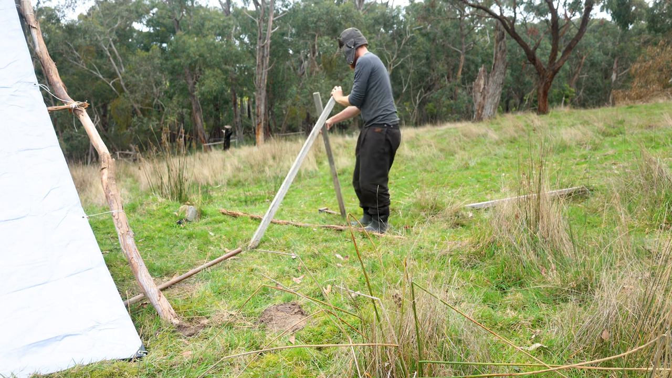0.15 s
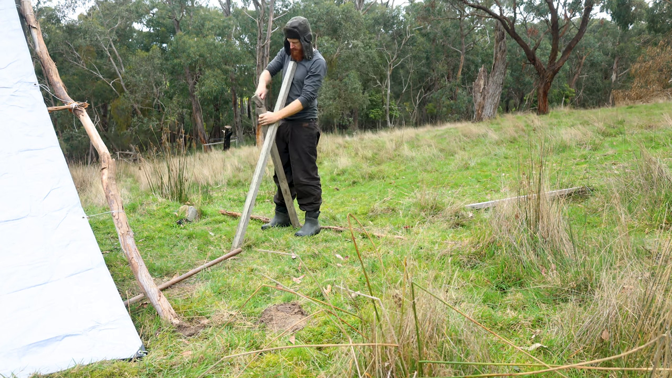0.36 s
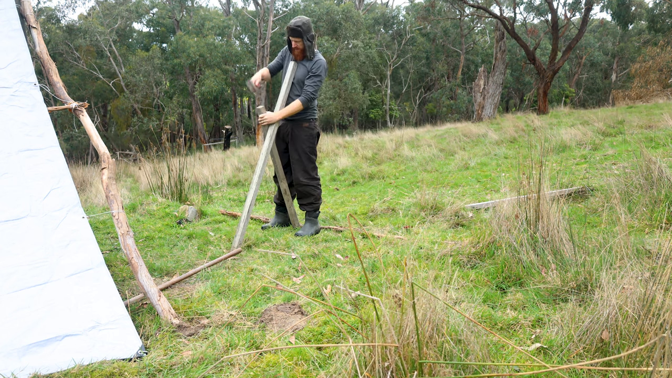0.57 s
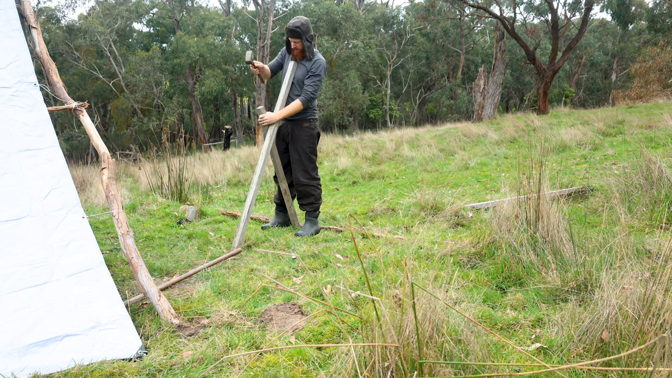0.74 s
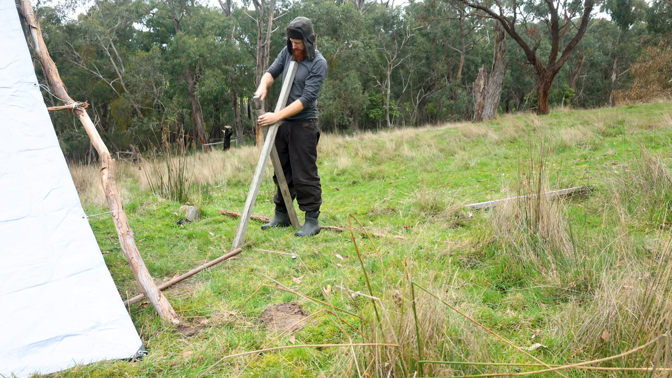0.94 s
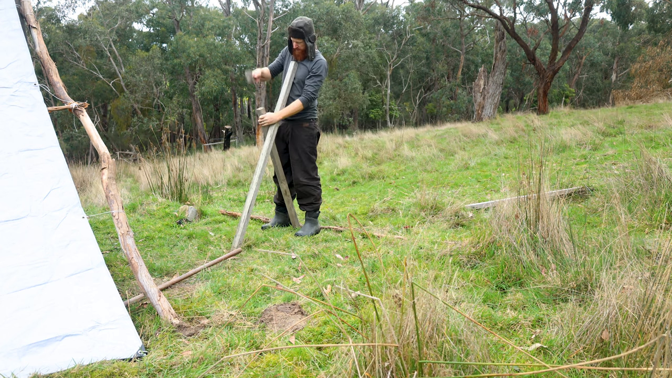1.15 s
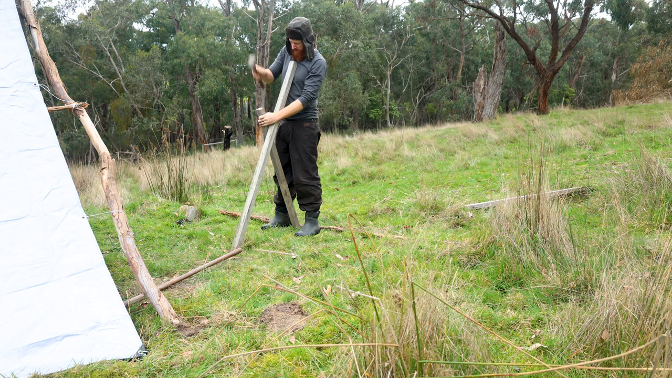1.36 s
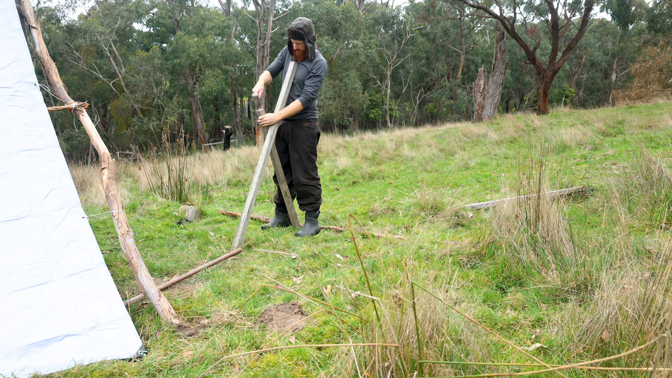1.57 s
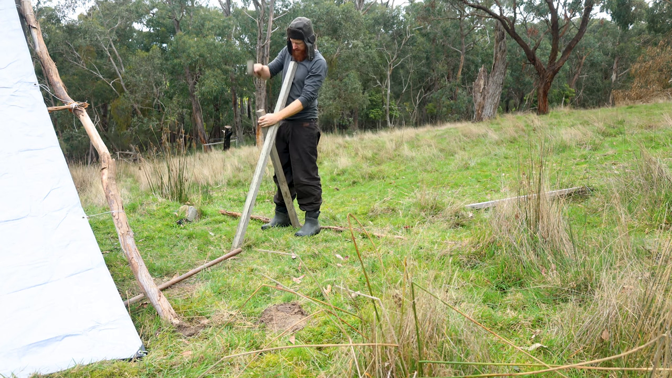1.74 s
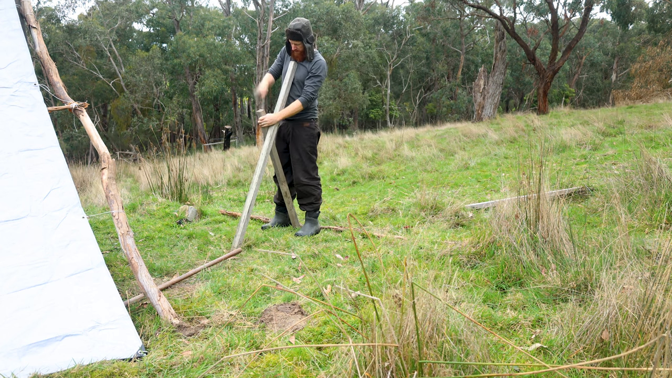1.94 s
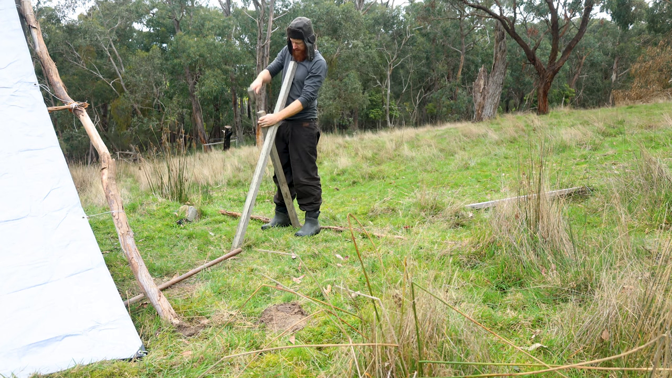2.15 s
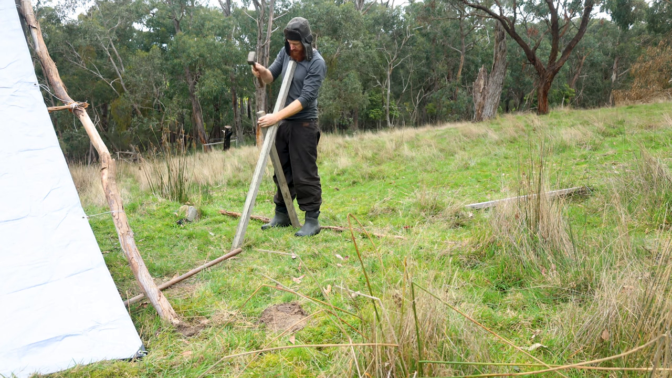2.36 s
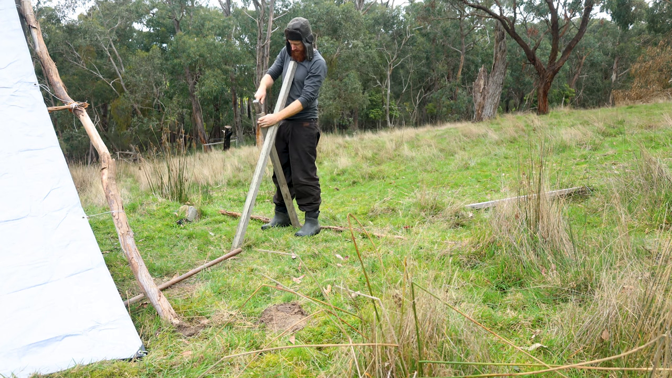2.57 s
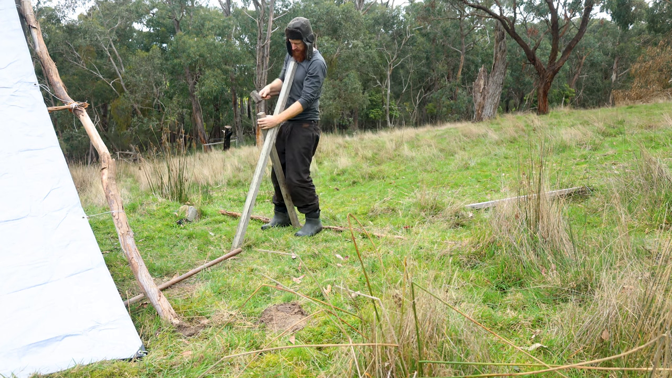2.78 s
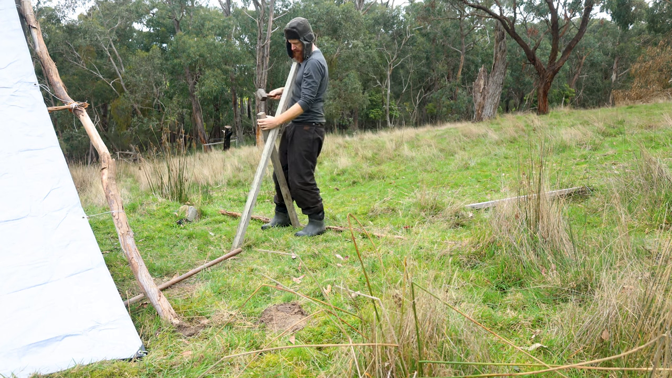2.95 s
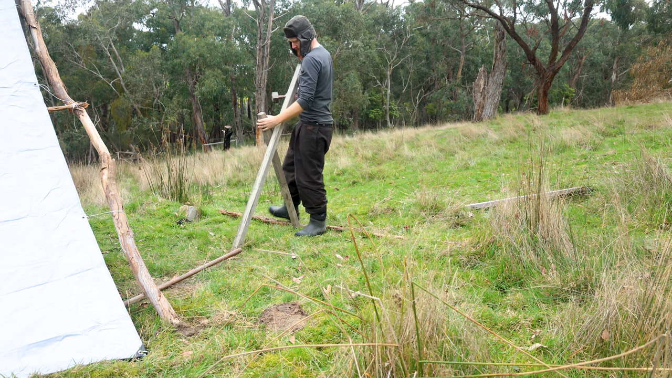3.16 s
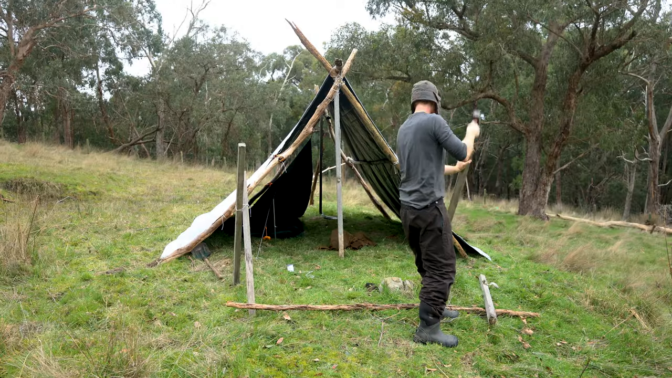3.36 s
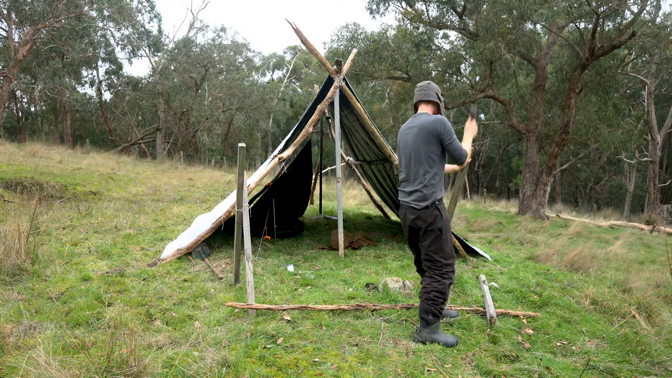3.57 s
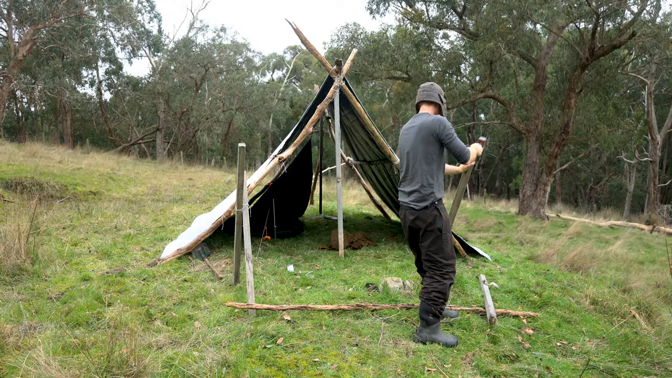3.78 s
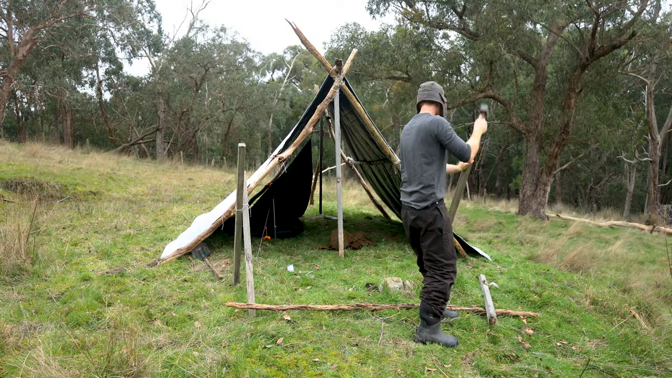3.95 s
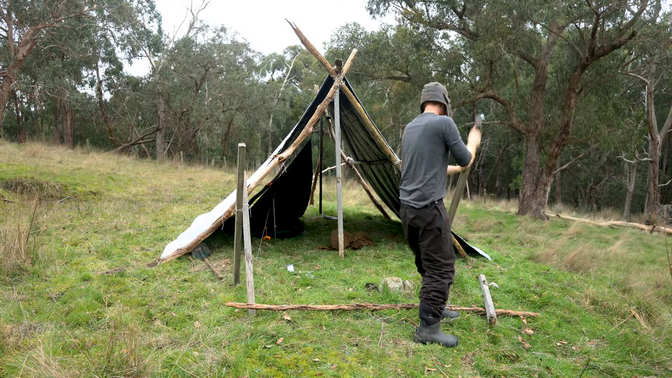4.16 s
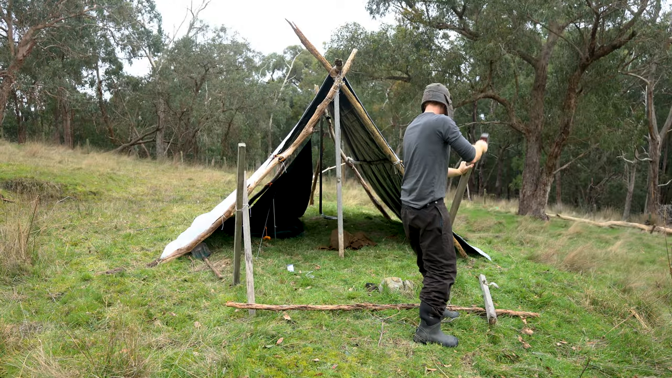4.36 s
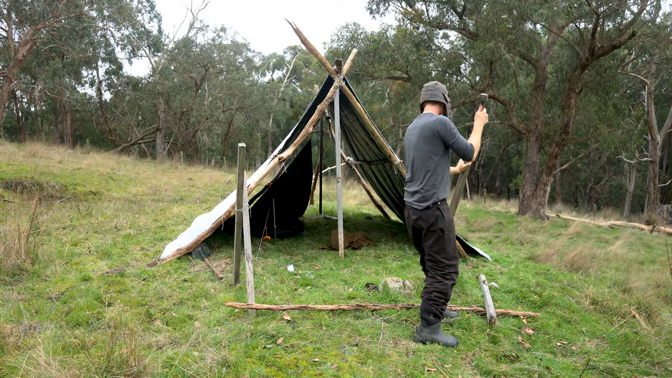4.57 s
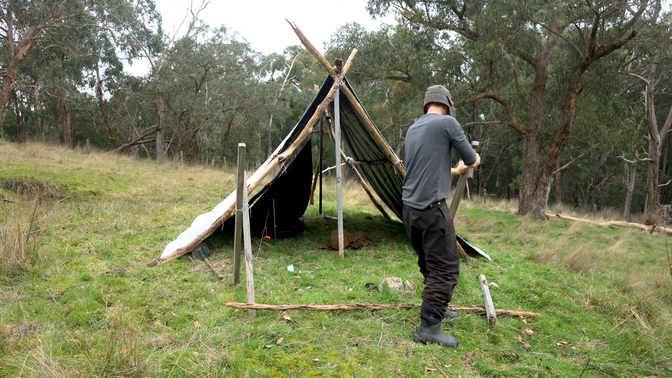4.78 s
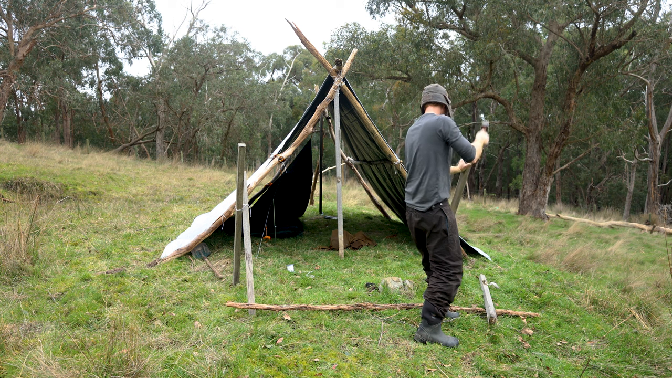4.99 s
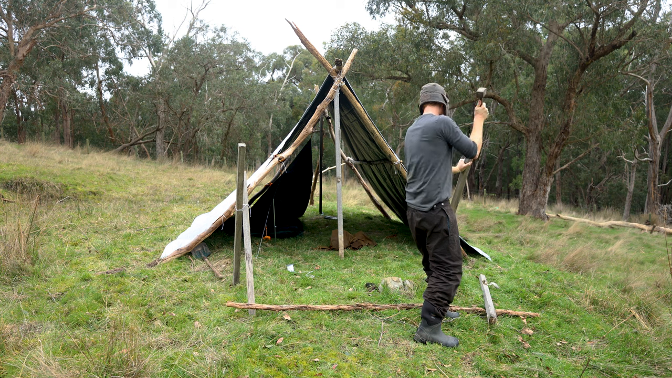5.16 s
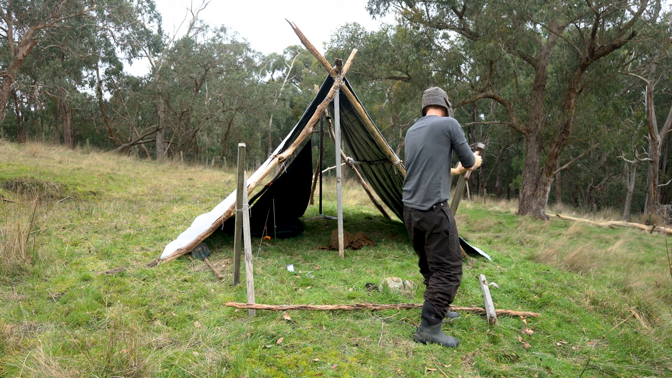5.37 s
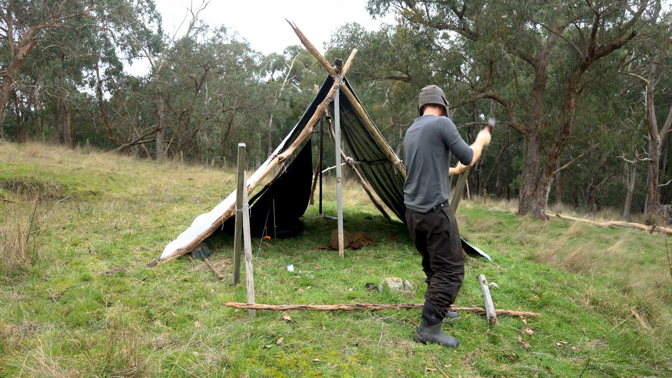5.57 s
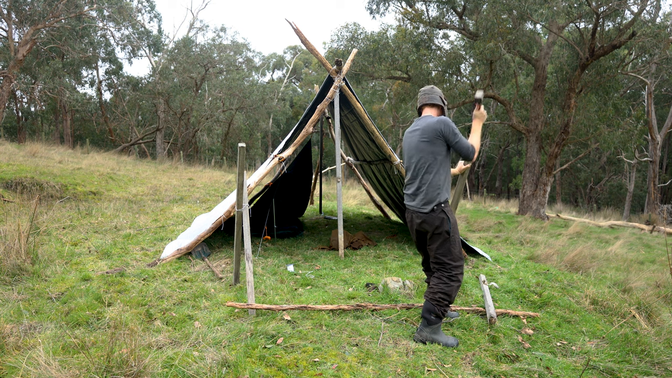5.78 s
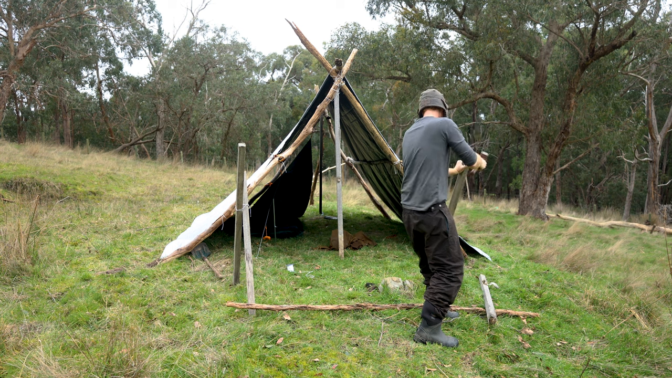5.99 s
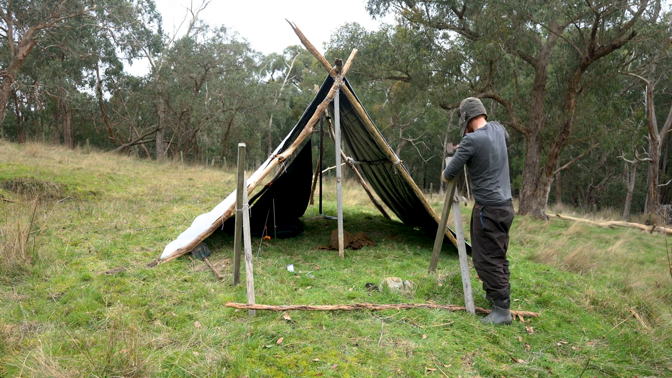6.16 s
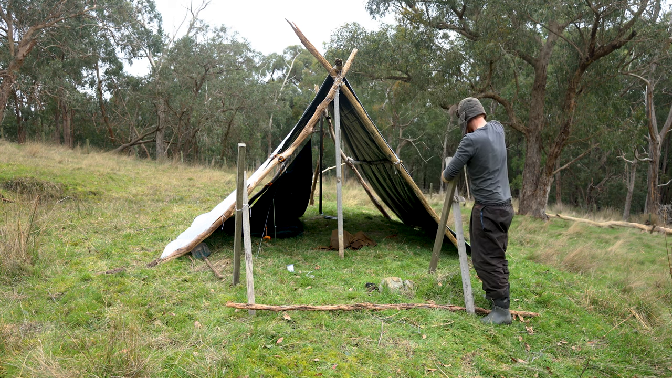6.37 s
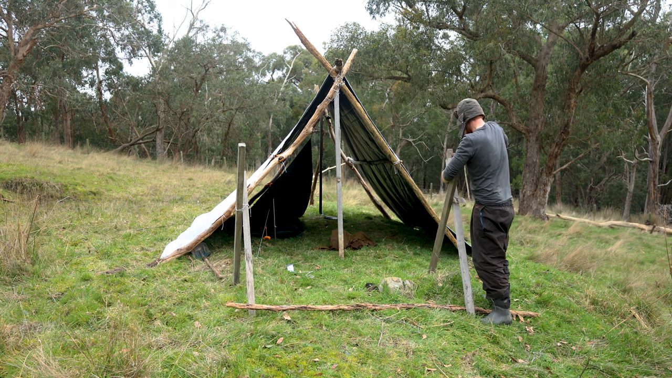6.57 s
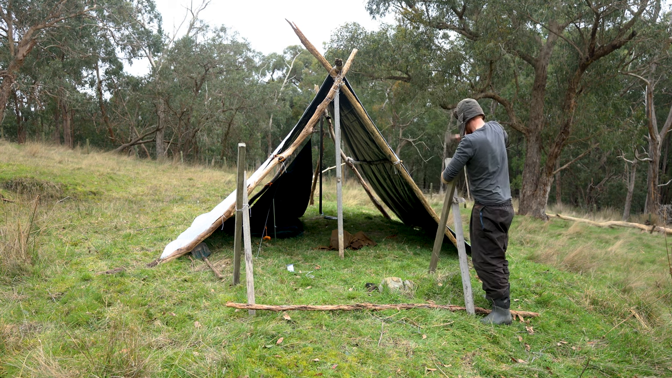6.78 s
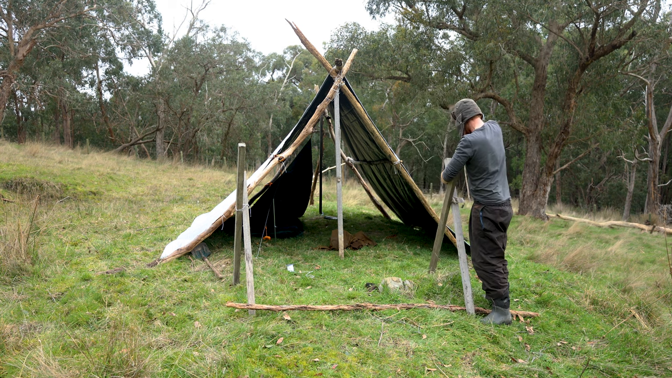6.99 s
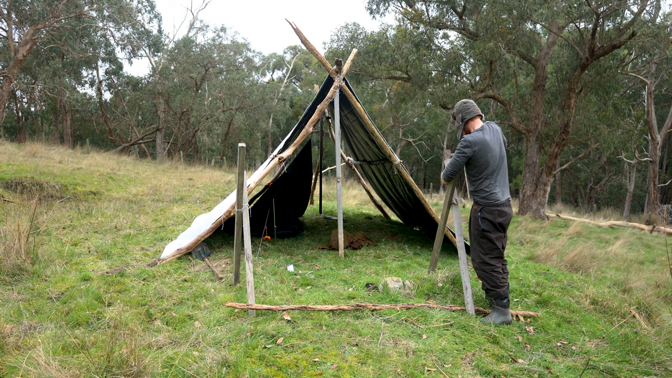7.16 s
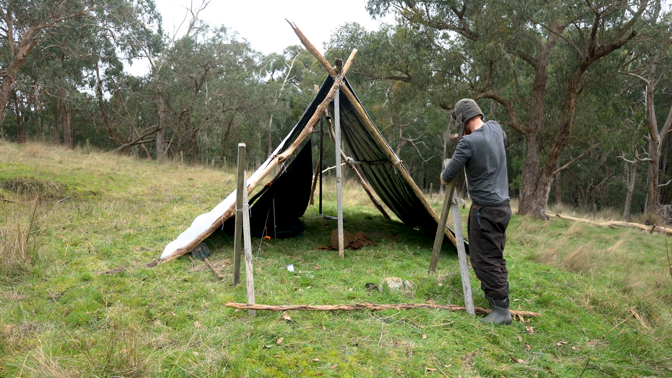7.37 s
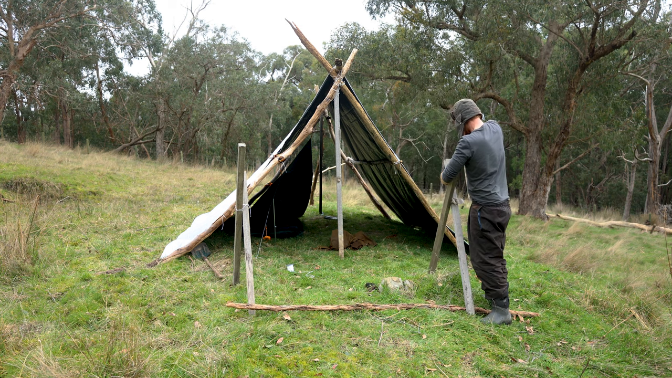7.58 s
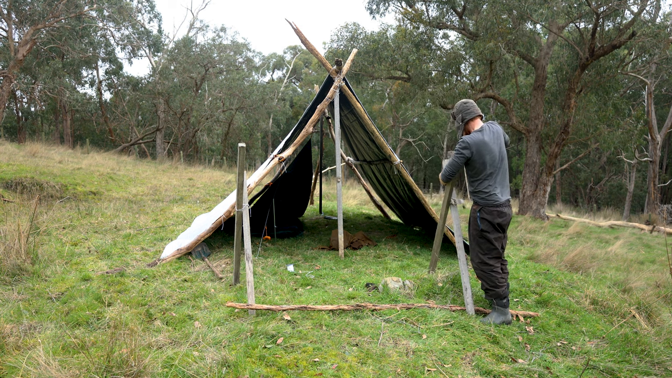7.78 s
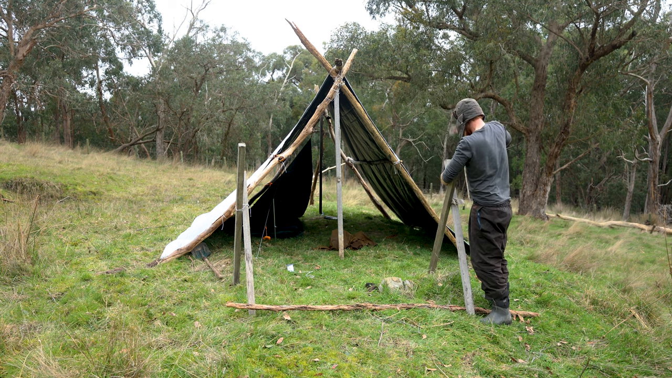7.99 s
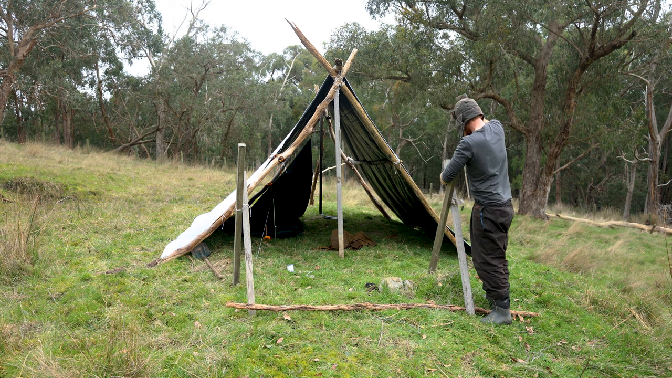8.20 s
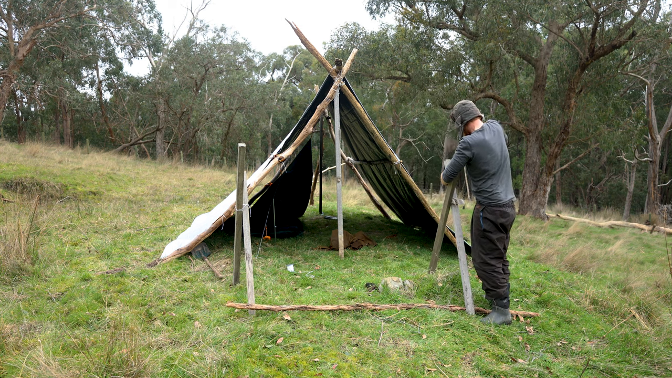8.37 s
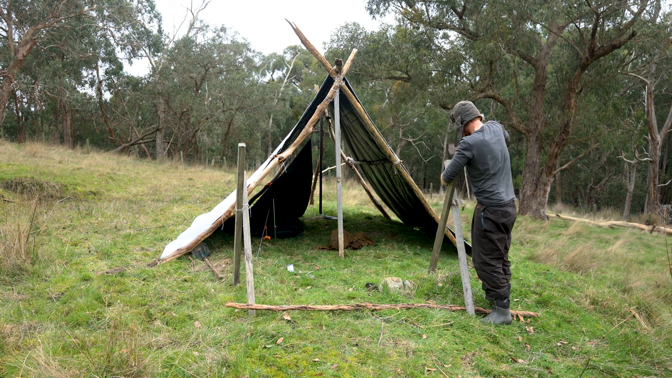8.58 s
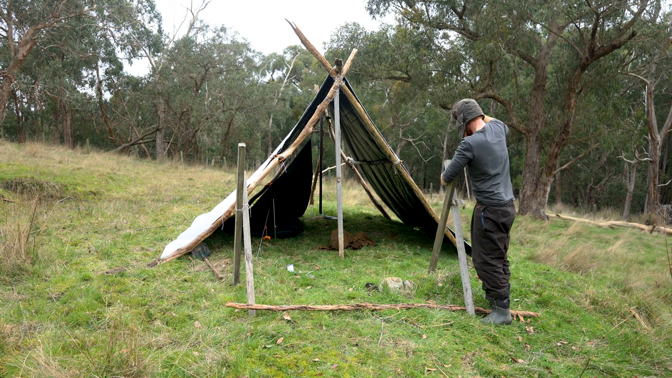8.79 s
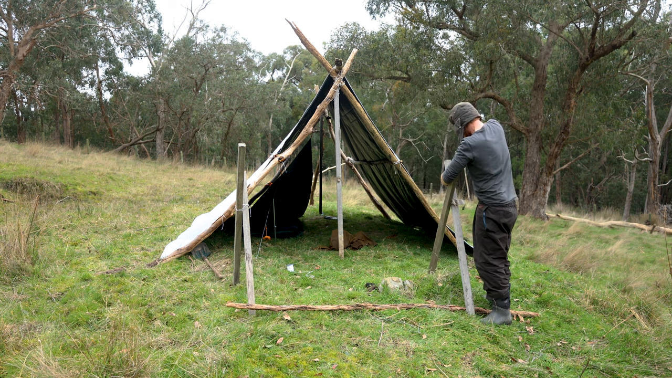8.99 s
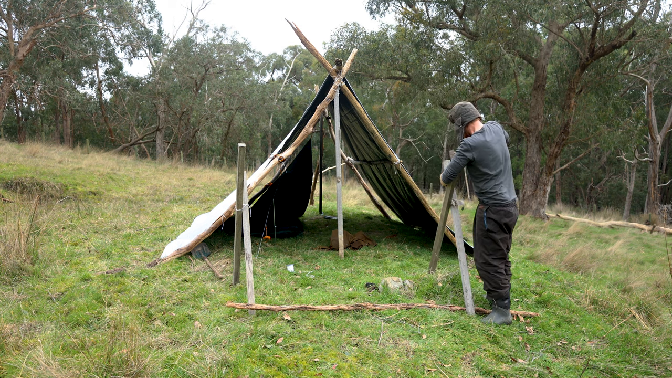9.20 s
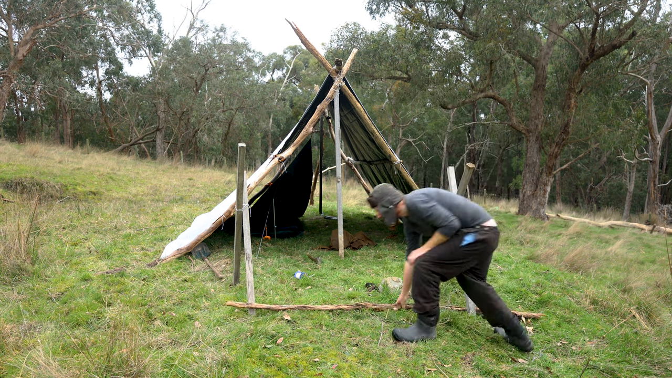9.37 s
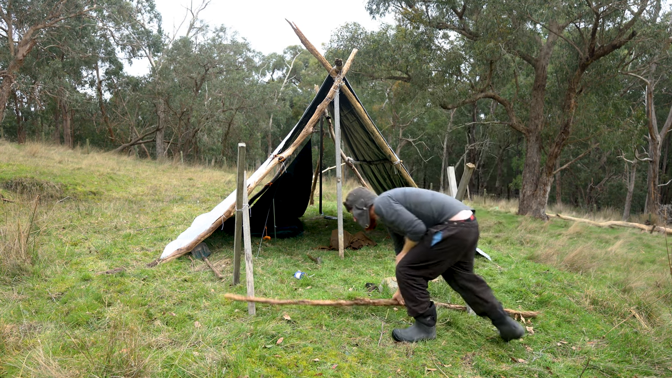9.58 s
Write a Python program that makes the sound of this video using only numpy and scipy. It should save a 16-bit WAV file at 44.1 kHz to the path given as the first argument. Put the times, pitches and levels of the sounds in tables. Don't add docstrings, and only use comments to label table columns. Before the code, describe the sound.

A boot brushes dry grass, then a hatchet back hits nails in dry wooden poles, roughly every half second. Each loud, clipped crack rings woody and metallic, then slaps back from trees and tarp with a grainy tail. Abrupt changes of spot alter the tone. Leaves hiss, wind rumbles on the close microphone, tiny birds chirp, and rustling steps end it.

```python
import sys
import numpy as np
from scipy import signal
from scipy.fft import rfft, irfft
from scipy.io import wavfile
from scipy.ndimage import uniform_filter1d

SR = 44100
rng = np.random.default_rng(int(sys.argv[2]) if len(sys.argv) > 2 else 0)


def wrap_up_sound(samples):
    columns = np.atleast_2d(samples).T
    tamed = np.clip(columns, -1, 1)
    steps = np.round(tamed * 32767).astype(np.int16)
    wavfile.write(sys.argv[1], SR, steps)


def gain_from_db(level_db):
    decades = np.asarray(level_db, float) / 20
    return 10 ** decades


N = 425124


def rms_one(x):
    return x / np.sqrt(np.mean(x ** 2) + 1e-20)


def cut(x, hz, kind, order=2):
    return signal.sosfilt(signal.butter(order, hz, kind, fs=SR, output="sos"), x)


def resonate(x, hz, width_hz):
    r = np.exp(-np.pi * width_hz / SR)
    feedback = [1, -2 * r * np.cos(2 * np.pi * hz / SR), r * r]
    return signal.lfilter(np.array([1, 0, -1]) * (1 - r * r) / 2, feedback, x + 1e-18)


def soften(x, hz):
    r = np.exp(-2 * np.pi * hz / SR)
    return signal.lfilter([(1 - r) ** 2], [1, -2 * r, r * r], x)


def sing(hz):
    return np.sin(2 * np.pi * np.cumsum(hz) / SR)


def add(out, sound, s):
    i = round(s * SR)
    out[i:i + len(sound)] += sound[:len(out) - i]


def in_time(rows):
    s, *columns = np.transpose(rows)
    t = np.arange(N) / SR
    return [np.interp(t, s, c) for c in columns], (t >= s[0]) & (t <= s[-1])


def drift(rate):
    sos = signal.butter(2, rate, fs=SR / 32, output="sos")
    slow = signal.sosfilt(sos, rng.standard_normal(N // 32 + 2002))[2000:]
    return np.interp(np.arange(N) / 32, np.arange(len(slow)), rms_one(slow))


def tent(t, at, db, swell_db, fade_db):
    return gain_from_db(db - swell_db * (at - t).clip(0) - fade_db * (t - at).clip(0)) ** 2


def causal(power):
    ceps = irfft(np.log(power + 1e-12 * power.max()) / 2)
    ceps[1:len(ceps) // 2] *= 2
    ceps[len(ceps) // 2 + 1:] = 0
    return irfft(np.exp(rfft(ceps)))


def linger(x, t60):
    t = np.arange(SR // 2) / SR
    tail = rng.standard_normal(len(t)) * gain_from_db(-60 * t / t60)
    return signal.oaconvolve(x, tail / np.sqrt(np.sum(tail ** 2)))[:N]


SCENES_S = [0, 3.387, 6.186, 9.314, 10]
# frequency in Hz, level in dB per Hz.
LEAVES = [(35, -30), (60, 1.5), (113, 0), (274, -11), (346, -7.5), (903, -8), (1040, -20), (1110, -8.5),
          (1470, -33.5), (2140, -31), (2300, -28.5), (3850, -29), (16000, -32.5)]
LEAVES_DB = [-49, -51.5, -51.5, -50.5]


def leaves():
    edges = 60 * 2 ** np.arange(0, 8.6, .5).clip(max=8.05)
    white = rng.standard_normal((2, N))
    hz, db = np.transpose(LEAVES)
    out = 0
    for k, (low, high) in enumerate(zip(edges, edges[1:])):
        gain_db = np.interp(np.log(low * high) / 2, np.log(hz), db)
        out = out + gain_from_db(gain_db) * cut(white[k % 2], [low, high], "band")
    out = cut(out, 15000, "low", order=1)
    place = np.searchsorted(SCENES_S, np.arange(1, N + 1) / SR) - 1
    return rms_one(out) * gain_from_db(np.array(LEAVES_DB)[place])


# time in seconds, level in dB.
BREEZE = [(0, -57), (.3, -62), (1.5, -57.5), (3.3, -60.5), (4.9, -58), (6.3, -43.5), (7.5, -43.5),
          (9.2, -42), (9.64, -48)]
# start in seconds, peak level in dB.
GUSTS = [(3.394, -41.5), (3.93, -39.5), (4.485, -42), (5.057, -34), (5.283, -42), (5.621, -34.5),
         (5.985, -43), (6.192, -31.5), (6.572, -45), (6.956, -36.5), (7.381, -34.5), (7.616, -32),
         (7.911, -35), (8.229, -37), (8.644, -30), (8.962, -33)]


def wind(even_s=0.17, lumpy_db=2.0, gust_db=-3, gust_rise_s=0.016):
    (db,), _ = in_time(BREEZE)
    t = np.arange(N) / SR
    puffs = sum(tent(t, s + gust_rise_s, peak_db + gust_db, 246, 114) for s, peak_db in GUSTS)
    low = cut(rng.standard_normal(N + SR), 33, "low", order=3)
    low = cut(low, 32, "high")[SR:]
    low = low / np.sqrt(uniform_filter1d(low ** 2, size=round(even_s * SR)))
    calm_db = 5.3 * (t >= SCENES_S[3])
    return low * np.sqrt(gain_from_db(db) ** 2 + puffs) * gain_from_db(lumpy_db * drift(5.7) - calm_db)


# time in seconds, firing rate in Hz, level in dB.
ENGINE = [
    [(3.39, 36.9, -64), (4.7, 34.97, -61), (4.95, 33.26, -67), (5.22, 35.25, -67.5), (5.5, 34.04, -62.5),
     (6.18, 32.55, -61)],
    [(6.19, 30.2, -54), (8.37, 29.46, -55), (8.54, 26.46, -44), (8.62, 24.47, -52), (8.86, 24.34, -58),
     (9.04, 28.16, -53.5), (9.14, 29.8, -47), (9.31, 32.4, -52)],
]
# multiple of the firing rate, level in dB.
ORDERS = [(1, 0), (2, -13.5), (3, -1), (4, 6.2), (5, -0.5), (6, -18)]


def engine():
    out = 0
    for rows in ENGINE:
        (hz, db), on = in_time(rows)
        turn = 2 * np.pi * np.cumsum(hz * (1 + 0.0038 * drift(2.3))) / SR
        orders = sum(gain_from_db(order_db) * np.sin(k * turn + k * k) for k, order_db in ORDERS)
        out = out + on * gain_from_db(db) * orders
    return out


# time in seconds, pitch in Hz, level in dB.
FAR_CALLS = [
    [(8.22, 1590, -72), (8.3, 1600, -62), (8.37, 1670, -61), (8.44, 1640, -62), (8.52, 1650, -64)],
    [(8.78, 1620, -72), (8.86, 1640, -65), (8.94, 1570, -62), (9.0, 1450, -68), (9.03, 1400, -74)],
]


def far_calls(blur_db=3.0, waver=.004):
    shake = 1 + waver * drift(36)
    flicker = gain_from_db(blur_db * drift(25))
    out = 0
    for rows in FAR_CALLS:
        (hz, db), on = in_time(rows)
        out = out + on * gain_from_db(db) * sing(hz * shake)
    return out * flicker


# time in seconds, pitch in Hz, level in dB.
WHISTLE = [(-.045, 5100, -26.5), (-.02, 5400, -19.5), (-.006, 6200, -17), (.001, 6700, 0),
           (.011, 6850, -3.5), (.017, 7700, -5), (.024, 8200, -2), (.032, 7730, 1.5), (.042, 7500, -25.5)]
# time in seconds, level in dB.
WHISTLES = [
    (.424, -41),
    (1.937, -42.5),
]
# length in seconds, end pitch over start pitch.
NOTES = [
    (.035, .98),
    (.035, .89),
    (.017, 1.22),
    (.017, .78),
    (.09, .98),
]
# start in seconds, start pitch in Hz, level in dB.
CHIRPS = [
    [(.77, 8100, -65), (1.74, 4900, -56), (1.732, 6450, -59), (1.732, 8200, -68), (2.555, 8500, -70),
     (4.156, 8050, -60), (5.03, 8130, -54), (5.638, 8700, -57), (5.865, 8000, -64), (6.5, 8300, -59),
     (8.3, 8800, -62)],
    [(3.465, 8300, -60), (4.105, 8300, -61), (4.305, 8350, -53), (6.865, 8700, -57), (7.635, 8300, -58),
     (8.082, 8350, -59), (8.655, 8240, -57)],
    [(4.138, 7300, -62), (6.52, 8000, -60), (6.89, 8200, -61), (7.655, 7950, -63), (8.105, 7950, -60)],
    [(4.763, 7700, -58), (5.263, 7300, -62), (5.291, 8000, -59), (5.306, 7300, -61), (5.352, 6300, -62),
     (5.444, 8400, -56), (5.853, 7840, -60), (8.29, 10200, -55), (8.295, 8600, -55), (8.363, 5600, -62)],
    [(9.108, 2670, -59.5), (9.13, 3500, -69)],
]


def birds(echo_db=-6, t60=.7, far_echo_db=-5, far_t60=.25, warble=.018):
    near, far = np.zeros((2, N))
    s, hz, db = np.transpose(WHISTLE)
    t = np.arange(s[0], s[-1], 1 / SR)
    for at, level_db in WHISTLES:
        add(near, gain_from_db(level_db + np.interp(t, s, db)) * sing(np.interp(t, s, hz)), at + s[0])
    shake = 1 + warble * drift(200)
    for (length, bend), rows in zip(NOTES, CHIRPS):
        n = round(length * SR)
        for at, from_hz, level_db in rows:
            glide = from_hz * np.linspace(1, bend, n) * shake[round(at * SR):][:n]
            add(far, gain_from_db(level_db) * np.hanning(n) * sing(glide), at)
    return near + gain_from_db(echo_db) * linger(near, t60) + far + gain_from_db(far_echo_db) * linger(far, far_t60)


# time in seconds, level in dB.
DRONE = [(0, -45.5), (.2, -51), (.36, -51.5), (.45, -51)]


def drone():
    (db,), on = in_time(DRONE)
    return on * gain_from_db(db) * rms_one(resonate(rng.standard_normal(N), 337, 230))


# time in seconds, level in dB.
GRASS = [
    [(0, -62), (.06, -48), (.09, -41.5), (.11, -91), (.2, -72)],
    [(9.314, -51), (9.41, -54.5), (9.43, -44), (9.45, -50.5), (9.48, -43.5), (9.52, -47.5), (9.58, -51),
     (9.64, -55)],
]
# start in seconds, peak in dB, pitch in Hz, width in Hz, length in seconds.
SNAPS = [(.037, -44, 5000, 6000, .002), (.077, -35, 4000, 6000, .005), (.174, -50, 8000, 8000, .004),
         (2.968, -47, 11000, 9000, .004), (3.008, -52, 12000, 8000, .002), (3.252, -38, 6000, 9000, .006),
         (9.352, -37, 5000, 4000, .0005), (9.379, -35, 2500, 5000, .002), (9.395, -28, 7000, 8000, .0005),
         (9.422, -33, 5000, 11000, .005), (9.52, -48, 12000, 6000, .003), (9.585, -47, 8000, 4000, .001)]


def grass(per_s=6000, size_db=2.5):
    size = gain_from_db(size_db * rng.exponential(1, N))
    clicks = (rng.random(N) < per_s / SR) * size * rng.choice([-1, 1], N)
    brush = rms_one(cut(cut(clicks, 710, "high", order=1), 3000, "low", order=1))
    out = np.zeros(N)
    for rows in GRASS:
        (db,), on = in_time(rows)
        out += on * gain_from_db(db) * brush
    t = np.arange(2000) / SR
    for s, db, hz, width_hz, length in SNAPS:
        snap = resonate(rng.standard_normal(len(t)) * np.exp(-t / length), hz, width_hz)
        add(out, gain_from_db(db) * snap / np.abs(snap).max(), s)
    return out


# start in seconds, peak
# in dB, pitch in Hz.
THUMPS = [(0.539, -59.5, 694), (1.086, -30, 364), (1.628, -25.5, 363), (2.156, -25.5, 666),
          (2.679, -54, 318), (6.747, -35, 450), (7.295, -29, 450), (7.32, -34.5, 445), (7.886, -28, 566),
          (9.413, -28, 252)]


def thumps(push_s=0.004, width_hz=480, lift_db=4.5):
    out = np.zeros(N)
    t = np.arange(3000) / SR
    for s, db, hz in THUMPS:
        push = rng.standard_normal(len(t)) * np.exp(-t / push_s)
        thud = cut(resonate(push, hz, width_hz), 760, "low")
        add(out, gain_from_db(db + lift_db) * thud / np.abs(thud).max(), s)
    return out


# start in seconds, peak in dB, pitch in Hz, t60 in seconds.
JOLTS = [(1.578, -34, 95, .08), (4.903, -42, 110, .08), (5.467, -30, 102, .13), (6.043, -24, 93.8, 0.17),
         (8.537, -40, 150, .1), (9.213, -38, 190, 0.055)]


def jolts(rise_s=.004):
    out = np.zeros(N)
    t = np.arange(SR // 5) / SR
    for s, db, hz, t60 in JOLTS:
        swing = (1 - np.exp(-t / rise_s)) * np.sin(2 * np.pi * hz * t)
        add(out, gain_from_db(db - 60 * t / t60) * swing, s)
    return out


# delay in seconds, level in dB, swell and fade in dB per second.
STANDS = [
    [(.01, -25, 0, 900), (.09, -40, 200, 70), (.25, -44, 120, 60), (.33, -42, 30, 17)],
    [(.01, -18, 0, 600), (.113, -33, 200, 380), (.22, -40, 100, 10)],
    [(.01, -24, 0, 400), (.115, -33, 260, 280), (.23, -40, 50, 14)],
]
# upper end of the band in Hz, loss in dB per second.
AIR_LOSS = [(700, 20), (2500, 18), (5000, 29.5), (9000, 41), (16000, 63.5)]
DAMPNESS = [1.0, 1.08, 0.97]
# delay in seconds, level in dB, roughness of the face in
# seconds, lowest frequency returned in Hz.
SLAPS = [
    [(.022, -44.5, 0.00054, 500), (.133, -33.5, 0.003, 900), (.226, -34.5, 0.0066, 900),
     (.245, -74, 0.0023, 900), (.326, -44, 0.0036, 900)],
    [(.0315, -20, .0012, 700), (.057, -31, .0007, 1500), (.111, -30, .003, 400), (.16, -32, .002, 1500),
     (.196, -32, .0012, 1300), (.32, -40.5, .004, 800)],
    [(.031, -22.5, 0.004, 900), (.112, -34, 0.0033, 700), (.16, -57, .002, 900), (.2, -32.5, 0.0037, 700),
     (.31, -48, 0.0072, 900), (.39, -39, 0.006, 700)],
]


def trees(spot, grain_db=1.5, wash_db=-24, horizon_s=1, beyond_db_per_s=53):
    t = np.arange(round(1.2 * SR)) / SR
    grains = rng.standard_normal(len(t)) * gain_from_db(grain_db * drift(77)[:len(t)])
    wash, below = 0, 0
    for k, (hz, fade_db) in enumerate(AIR_LOSS):
        low = cut(grains, hz, "low")
        damp = DAMPNESS[spot] if k else 1
        wash = wash + (low - below) * gain_from_db(-fade_db * damp * t)
        below = low
    power = sum(tent(t, *stand) for stand in STANDS[spot])
    fade = gain_from_db(wash_db - beyond_db_per_s * (t - horizon_s).clip(0))
    wash = wash * np.sqrt(power) * fade * (t > .004)
    slaps = np.zeros(len(t))
    for delay, db, rough_s, low_hz in SLAPS[spot]:
        face = rng.standard_normal(400) * np.exp(-np.arange(400) / SR / rough_s)
        face = face / np.sqrt(np.sum(face ** 2))
        add(slaps, gain_from_db(db) * cut(face, [low_hz, 4800 / (1 + 6.6 * delay)], "band"), delay)
    return cut([wash, slaps], [340, 9500], "band")


FALL_S = [0.0016, 0.0015, 0.0022]


def contact(chatter, hz, spot, rise_s, touch_s, touch_db, rattle):
    t = np.arange(len(chatter)) / SR
    fall = np.exp(-t / FALL_S[spot] * (hz / 1500) ** 0.55)
    push = chatter * (1 - np.exp(-t / rise_s)) * fall
    add(push, gain_from_db(touch_db) * push * chatter[::-1], touch_s)
    rattle_s, rattle_db, length = rattle
    dull_db = 6 * max(np.log2(hz / 2000), 0)
    rattling = np.roll(chatter, shift=999) * np.exp(-t / length * (hz / 1500))
    add(push, gain_from_db(rattle_db - dull_db) * rattling, rattle_s)
    return push


# pitch in Hz, width in Hz, level in dB.
POLES = [
    [(188, 130, -23.5), (413, 110, -27), (659, 91, -8.5), (1065, 263, 1.5), (1542, 170, 7),
     (1955.4, 620, 1), (2680, 98, -2.5), (3170, 520, -1.5), (4660, 4300, -19), (5100, 670, -13),
     (6370, 240, -17), (7500, 730, -15), (11900, 17, -35), (14100, 4000, -41)],
    [(127, 89, -12.5), (258, 78, -6.5), (425, 146, -3), (579, 290, -1.5), (1053, 620, 3.5), (1233, 57, 4),
     (1723, 350, 1), (2135, 390, -2.5), (2280, 750, -12.5), (3340, 1870, -21), (5500, 260, -38),
     (8300, 710, -46.5), (12900, 1500, -52)],
    [(361, 310, -17), (627, 66, -8.5), (909, 95, 0), (1243, 240, 2), (1644, 152, 8), (2220, 290, -8),
     (2680, 700, -7.5), (3140, 41, -14.5), (4250, 510, -23), (4870, 230, -28), (6450, 2600, -31.5),
     (8500, 460, -44), (12400, 1800, -39)],
]
NAIL_HZ = [1955, 1408, 1745]
# width in Hz, levels of multiples 1, 2 and 3 in dB.
NAILS = [(60, -2, -9, -26), (75, -3, -12, -19), (60, 0, -11, -19)]
# low thud, nail ring and 3-6 kHz crack in dB below the peak.
USUAL_DB = [(-26.5, -25, -17), (-18.5, -11.5, -17.5), (-26.5, -11.5, -17.5)]
TOP_DB = [0, 24, 16.5]


def knock(spot, peak_db, colour_db, landing, touch, rattle, tint_db, blur=1.15, nail_blur=.8,
          nail_out_db=5, steep=1.15, scatter_db=1.5, even=0.59, sheen_db_per_khz=0.5):
    bins = np.fft.rfftfreq(SR // 9, 1 / SR)
    chatter = np.sign(rng.standard_normal(SR // 9))
    low_db, nail_db, crack_db = np.subtract(colour_db, USUAL_DB[spot])
    rise_s, deep_db, body_db, bite_db, air_db = landing
    touch_s, touch_db, snap_db, trees_db = touch
    top_db = TOP_DB[spot] + 0.042 * crack_db
    tilt_hz = [250, 600, 1100, 1600, 2300, 3500, 5000, 9000, 12000]
    tilt_db = [low_db + deep_db, low_db, body_db, 0, bite_db, crack_db,
               .7 * crack_db + .3 * top_db + snap_db, top_db + air_db / 2, top_db + air_db]

    def tilt(hz):
        return np.interp(np.log(hz), np.log(tilt_hz), tilt_db)

    # Hz, width toward the trees, width at the microphone, dB, extra dB toward the trees
    modes = [(hz, width_hz * blur, width_hz, db + tilt(hz), 0) for hz, width_hz, db in POLES[spot]]
    nail_width_hz, *series_db = NAILS[spot]
    for k, db in enumerate(series_db, 1):
        hz = k * NAIL_HZ[spot]
        width_hz = nail_width_hz * k ** .5
        modes.append((hz, nail_blur * width_hz, width_hz, db + nail_db + .5 * tilt(hz), nail_out_db))

    blow = spread = likely = 0
    for k, (hz, wide_hz, width_hz, db, out_db) in enumerate(sorted(modes)):
        push = contact(chatter, hz, spot, rise_s, touch_s, touch_db, rattle)
        share = (-1) ** k * gain_from_db(db + scatter_db * rng.standard_normal())
        ring = soften(resonate(push, hz, width_hz), 2.95 * hz)
        blow = blow + share * ring / np.abs(rfft(ring)).max()
        peak = 1 + (2 * (bins - hz) / max(width_hz, 200)) ** 2
        likely = likely + share ** 2 / peak / (1 + (bins / hz / 2.25) ** 2) ** 2
        outward = share * gain_from_db(out_db) / (1 + (bins / hz / 7.2) ** 2)
        skirt = (bins ** 2 - hz ** 2) / (bins + 1) / wide_hz
        spread = spread + outward ** 2 / (1 + skirt ** 2) ** steep

    likely = likely * gain_from_db(-sheen_db_per_khz * bins / 1000)
    wanted, actual = uniform_filter1d([likely, np.abs(rfft(blow)) ** 2], size=35)
    sub, hollow, woody, hard, thin = tint_db
    tint_hz = [170, 320, 470, 650, 850, 1200, 1500, 1900, 2600, 5500, 7500, 10000]
    tint_levels = [sub, 0, hollow, 0, woody, 0, 0, hard, 0, 0, thin, 0]
    tint = gain_from_db(np.interp(np.log(bins + 1), np.log(tint_hz), tint_levels)) ** 2
    blow = irfft(rfft(blow) * rfft(causal(tint * (wanted / actual) ** even)))
    blow = gain_from_db(peak_db) * blow / np.abs(blow).max()
    return blow, rms_one(causal(tint * spread)) * np.std(blow) * gain_from_db(trees_db)


# start in seconds, peak in dB, then the low thud, the nail's ring and the
# 3-6 kHz crack in dB relative to the peak.
BLOWS = [
    [(0.485, 4, -26.5, -14, -14), (1.029, 2, -21.5, -34, -20), (1.575, 2.5, -25, -27, -25),
     (2.103, 2, -18.5, -19, -10), (2.622, 4, -21.5, -15.5, -8.5)],
    [(3.779, 2.5, -27, -3.5, -11), (4.333, -0.5, -26.5, -5, -2.5), (4.9012, -3, -16, -8, -12),
     (5.4658, -1.5, -15.5, -7, -0.5), (6.04, 1, -24, -5.5, -6)],
    [(6.692, 0.5, -16.5, -13.5, 0), (7.251, 1.5, -19, -11.5, -2), (7.832, 0.5, -20, -10, -16),
     (8.533, 0, -23, -22, -9), (9.209, 3, -25, -1.5, -10)],
]
UNSEEN = [
    (3.231, -3.5, -15, -12, -2.5),
    (6.136, 1.5, -19, -23, -1.5),
]
# rise of the push in seconds, then the lift of the
# pole near 250, 1100, 2300 and 12000 Hz in dB.
LANDINGS = [
    [(.0003, -0.5, -2, -8.5, -16.5), (.0003, -1, 1, 6, 14.5), (.0003, 4.5, -2, 6, 10),
     (.0003, -8, 0, -9, -2), (.0003, 7, 0.5, -2, 1.5)],
    [(0.00047, 0.43, -3, 4.5, -5), (0.0012, 1.4, -1, 4.5, -8), (0.0013, -0.53, 7, 6, -3),
     (0.00071, -0.79, 4, 4, 0), (0.00084, 0.033, 0, 1.5, -9), (.001, 0, 10.5, 7.5, 0)],
    [(0.0008, -15, 4, 5, -4.5), (0.0013, -5, -3.5, 4, 6.5), (0.00034, -6, 7, 3, 0.5),
     (0.00027, 5.5, -1, 1.5, 0), (0.00037, 0, -6.5, -1, 1.5), (0.0009, 5.5, 3, 2.5, 1.5)],
]
# delay in seconds, level in dB, lift of the pole near
# 5000 Hz in dB, lift of what reaches the trees in dB.
TOUCHES = [
    [(0.0028, -7.5, 4, 0), (0.0022, -7, -1, -3), (.0028, 2.5, 5.5, -2.5), (0.0022, -4, 1.5, -0.5),
     (.0022, -9, 7, 2.5)],
    [(.004, -6, 12.5, 0.5), (.0035, -5, -4.5, 1), (.004, 1, 13, -0.5), (.004, -1, 0, 0),
     (.004, -11, 13, 1.5), (.004, -1, -2.5, 1.5)],
    [(.0028, -10.5, 3.5, -0.5), (.01, -28.5, 2.5, -0.5), (.01, -17, 2, -2.5), (.003, -11, -2, -4),
     (.003, -12.5, -6, -2), (.01, -15, 4.5, 0)],
]
# delay in seconds, level in dB, length in seconds.
RATTLES = [
    [(.009, -24, 0.0047), (.009, -23.5, 0.005), (.009, -26, 0.0072), (.009, -20.5, .005),
     (.009, -37.5, .004)],
    [(.01, -49, 0.0024), (.01, -31, .004), (0.019, -18.5, 0.0013), (.0105, -11, 0.0013),
     (0.0097, -19.5, 0.0029), (.01, -18, 0.0045)],
    [(.015, -15, 0.002), (0.014, -24, 0.0016), (.012, -39, .004), (.012, -19.5, 0.0038),
     (0.011, -31.5, 0.0033), (0.01003, -24.5, .004)],
]
# lift near 170, 470, 850, 1900 and 7500 Hz in dB.
TINTS = [
    [(-2.5, 2, -3.5, -0.45, 0.85), (0.5, 2.5, 4.5, -1.5, 1.4), (0, 0, 4.5, -2, -0.6),
     (0.5, -1, -2.5, 0.86, 0), (0.5, -10, -0.5, -0.51, -2)],
    [(-1, 0.5, 4, 0.5, -0.5), (-2.5, 0.5, -1.5, -4.5, -3.5), (3.5, 3, 3, -0.5, 8), (6, 2, 4, 1.5, -5),
     (4, -1, 0, 0, -6), (1, -0.5, 0, -2.5, 0)],
    [(-6, 11, 1, 2, 0), (-6, 4, 1, -0.5, 0.5), (1, 1.5, 0.5, -3.5, 2.5), (-5.5, -2.5, 3.5, -2, -4.5),
     (7, -5.5, -0.5, -3.5, 0.5), (3, 3, 5.5, -2, 3.5)],
]


def hammering(drive_db=8.5, late_s=.0007, mirror=.15):
    out = np.zeros(N)
    for spot, seen in enumerate(BLOWS):
        direct, spread = np.zeros((2, N))
        blows = list(seen) + UNSEEN[max(spot - 1, 0):spot]
        manners = zip(blows, LANDINGS[spot], TOUCHES[spot], RATTLES[spot], TINTS[spot])
        for (s, db, *colour_db), *manner in manners:
            blow, outward = knock(spot, db + drive_db, colour_db, *manner)
            add(direct, blow, s + late_s)
            add(spread, outward, s + late_s)
        start, end = round(SCENES_S[spot] * SR), round(SCENES_S[spot + 1] * SR)
        lead = max(start - SR // 4, 0)
        facing = (1 - mirror) * spread + mirror * direct
        sent = [spread[lead:end], facing[lead:end]]
        echoes = signal.fftconvolve(sent, trees(spot), axes=1).sum(axis=0)
        out[start:end] = direct[start:end] + echoes[start - lead:end - lead]
    return out


def scene():
    poles = hammering() + jolts() + thumps()
    air = leaves() + drone() + wind()
    life = engine() + birds() + far_calls() + grass()
    return (poles + air + life)[None]


def starve(x, keep_hz=2600, block=1024, block_start=1309):
    loud = np.flatnonzero(np.abs(x[0]) > .15)
    gate = np.zeros(N)
    for i in loud[np.diff(loud, prepend=0) > SR // 5]:
        gate[i - (i - block_start) % block:i - 70] = 1
    gate = uniform_filter1d(gate, size=64)
    return x + gate * (cut(x, keep_hz, "low", order=6) - x)


def roll_off(x):
    return signal.sosfilt(signal.butter(12, 17040, fs=SR, output="sos"), x)


def record(dry, duck_db=8.5, release_db=32, ahead_s=0.008, top=1.0):
    t = np.arange(N) / SR
    loud = duck_db * (np.abs(dry[0]) > .8)
    held = np.maximum.accumulate(loud + release_db * t) - release_db * t
    size = round(ahead_s * SR)
    early = uniform_filter1d(np.append(held[size:], held[-size:]), size=size)
    duck = np.maximum(early, uniform_filter1d(held, size=size))
    x = dry * gain_from_db(-duck)
    x = x / (1 + (np.abs(x) / top) ** 6) ** (1 / 6)
    x = .94 * cut(starve(x), 16300, "low", order=10)
    return roll_off(x)


dry = scene()
out = record(dry)
wrap_up_sound(out)
```